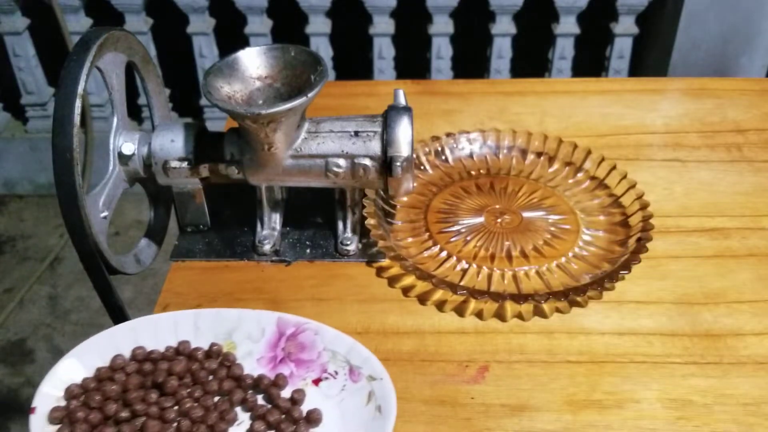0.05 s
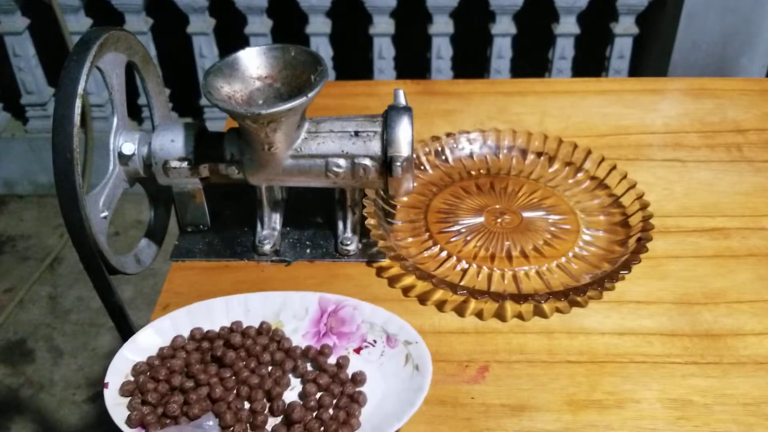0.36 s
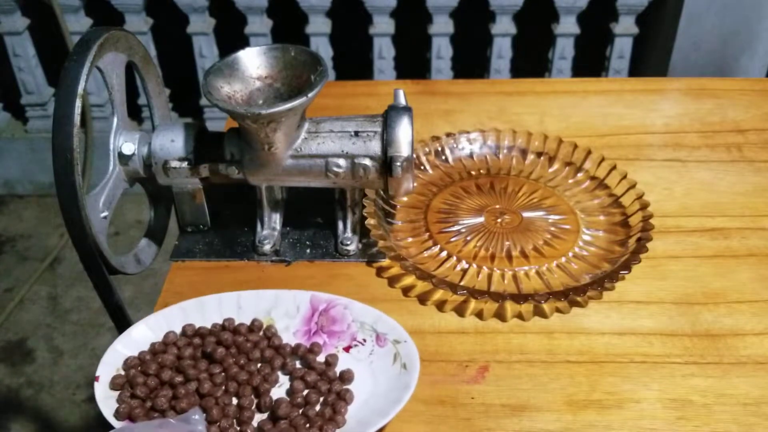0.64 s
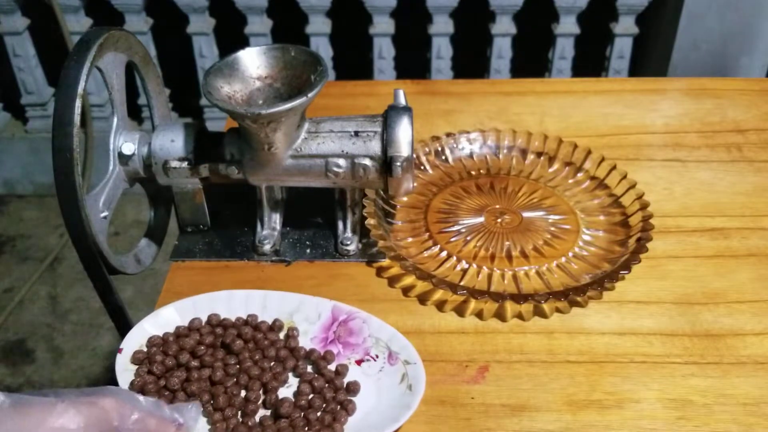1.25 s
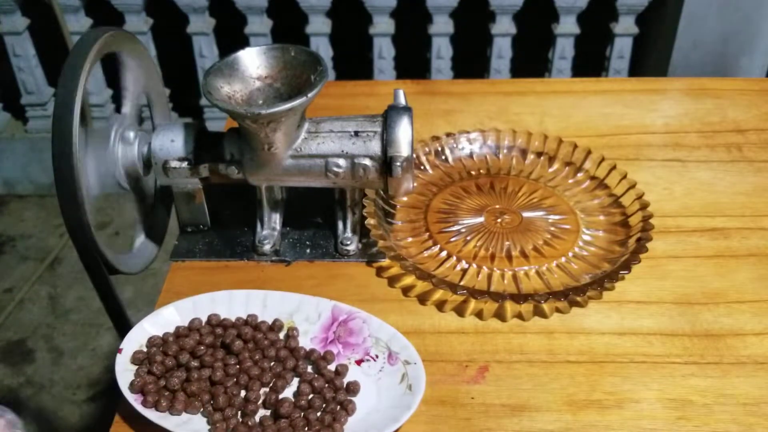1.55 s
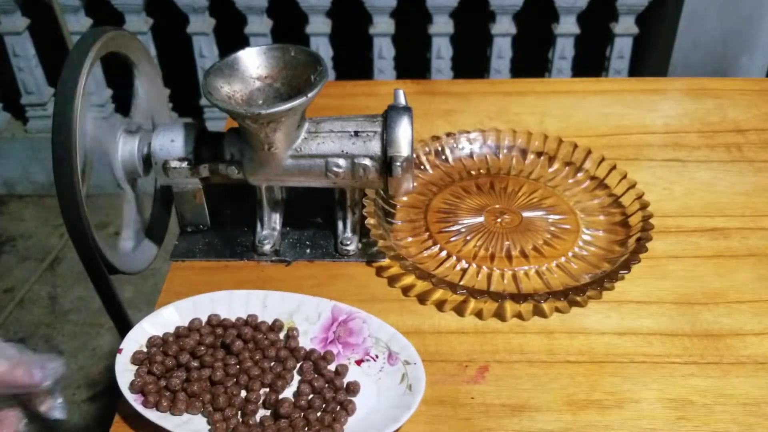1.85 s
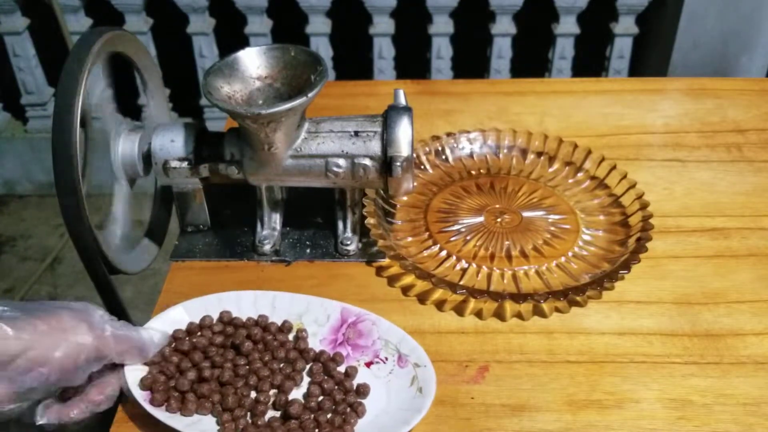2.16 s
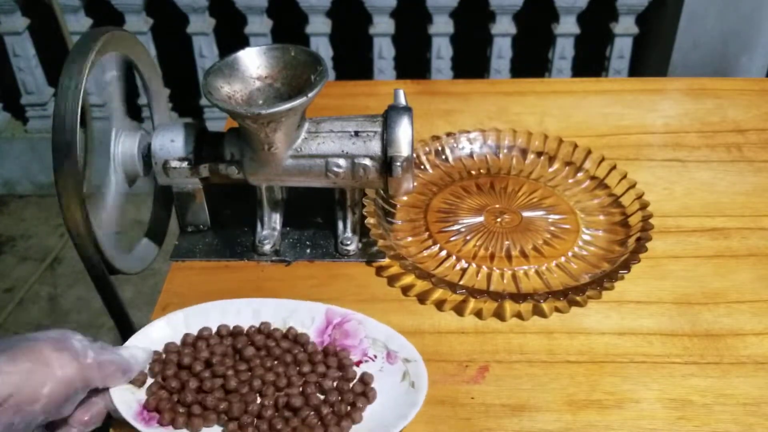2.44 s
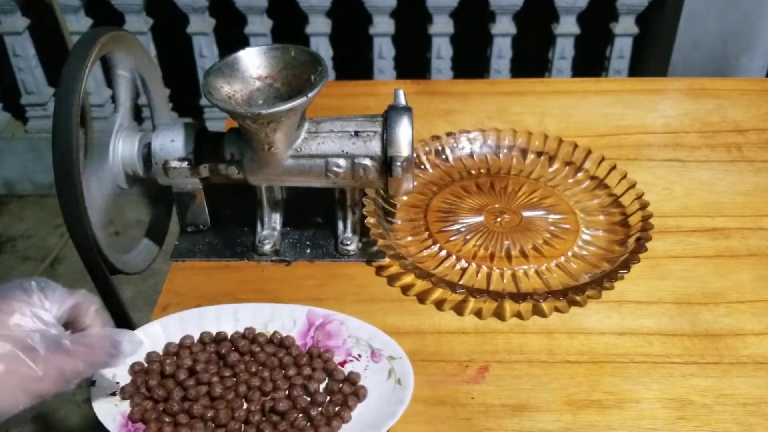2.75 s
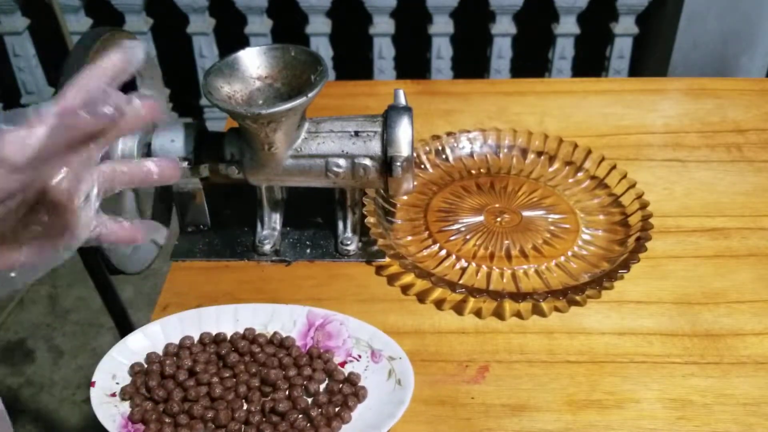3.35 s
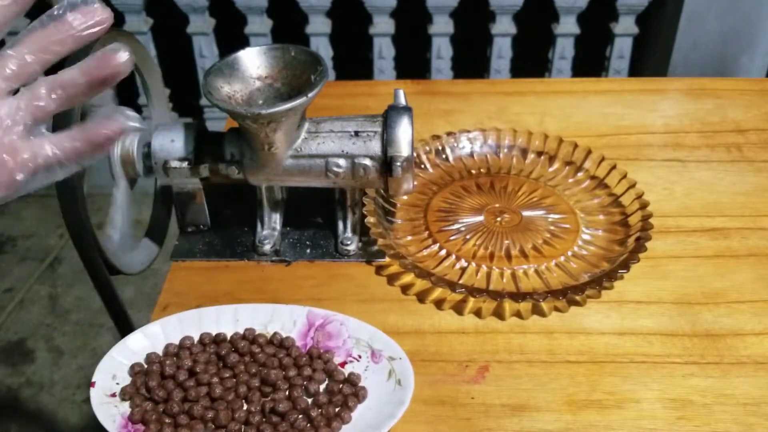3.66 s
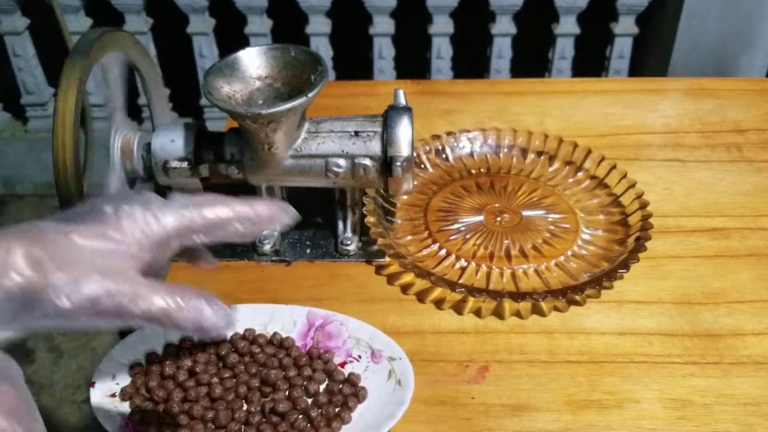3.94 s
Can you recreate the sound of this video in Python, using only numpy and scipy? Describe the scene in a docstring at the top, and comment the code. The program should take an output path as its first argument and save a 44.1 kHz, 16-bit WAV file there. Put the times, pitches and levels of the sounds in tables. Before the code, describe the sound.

An electric meat grinder runs with a low rumbling hum and uneven clanking, shaking a wooden table. Before it starts, a dish knocks and a switch clicks; near the end, a plastic glove crinkles close by on the left.

```python
"""A belt-driven meat grinder

A dish knocks on a wooden table, a switch clicks and the motor starts. It hums and forces the table
into vibration, while the loose pulley and auger clank irregularly, now and then exciting the modes
of the steel. A plastic glove crinkles, faintly at first and then close by, over a faint hiss with a
narrow band near 2 kHz."""
import sys
import numpy as np
from scipy import signal
from scipy.fft import rfft, irfft, next_fast_len
from scipy.io import wavfile
from scipy.ndimage import map_coordinates

SR = 44100
rng = np.random.default_rng(int(sys.argv[2]) if len(sys.argv) > 2 else 0)


def master_out(mix):
    """Clip the mix to full scale and print it as 16-bit PCM to the path in sys.argv[1]."""
    frames = np.transpose(np.atleast_2d(mix))
    ceiling = np.clip(frames, -1, 1)
    pcm = np.round(ceiling * 32767).astype(np.int16)
    wavfile.write(sys.argv[1], SR, pcm)


N = 176400

# Spectra of the noises. Each row: frequency in Hz, relative level in dB.
HISS_SPECTRUM = [(25, -27), (91, -13.5), (122, -1), (152, -8), (260, -17), (552, -16.5), (1050, -21),
                 (1410, -11.5), (1570, -15.5), (2120, -15), (2490, -15.5), (3170, -10), (3600, -17.5),
                 (5730, -23), (7500, -22.5), (9050, -27), (15500, -29.5)]
FILM_SPECTRUM = [(800, -36), (2500, -1.5), (4500, 2), (7800, 4), (9500, -1), (12500, 4), (15500, -0.5)]
TICK_SPECTRUM = [(100, -43), (500, -13), (3000, -2), (7000, 5.5), (15000, -2.5)]
DISH_CLICK_SPECTRUM = [(100, -50), (300, -4), (500, 2.5), (1200, -3), (1700, -10), (2300, -5), (2700, -15),
                       (3200, -25), (8000, -32)]
BUMP_CLICK_SPECTRUM = [(100, -40), (300, -13), (700, -6), (1400, 5), (1900, -11), (4000, -45)]
RUMBLE_SPECTRUM = [(25, -50), (45, -48), (57, -16), (66, -27), (80, -9.5), (98, 1.5), (118, -9.5),
                   (140, -4.5), (170, -12), (210, -9.5), (300, -6.5), (600, -56.5)]
GRIND_SPECTRUM = [(60, -34), (300, -1), (600, 7.5), (1000, -2), (1500, -11.5), (2200, -17.5), (3000, -13),
                  (5000, -24.5), (9000, -55), (15000, -64)]
CLATTER_SPECTRUM = [(80, -55), (300, -15), (600, 3.5), (780, 1.5), (950, -1.5), (1400, -3), (1750, -9.5),
                    (2200, -10.5), (3000, -29.5), (5000, -28), (12000, -59)]
SCRAPE_SPECTRUM = [(1200, -6), (2500, 2.5), (4500, 4), (5300, -14.5), (6000, -18), (8000, -7), (10000, -37),
                   (15000, -43)]
SNAP_SPECTRUM = [(150, -36), (900, 3), (1900, 3.5), (3000, -1.5), (4700, -0.5), (6500, -17), (9000, -11),
                 (15000, -26)]

# Envelopes of the glove and the running machine. Each row: time in seconds, relative level in dB.
GLOVE_FAR = [(0.0, -67.5), (0.076, -49.5), (0.18, -67), (0.366, -48.5), (0.548, -54.5), (0.716, -50.5),
             (0.898, -55.5), (1.1, -50), (1.282, -54), (1.368, -50), (1.42, -58), (1.454, -44),
             (1.498, -48), (1.55, -69)]
GLOVE_NEAR = [(1.6, -58), (1.9, -54), (2.1, -49.5), (2.3, -54), (2.7, -54.5), (2.76, -44), (2.94, -63.5),
              (3.03, -42), (3.125, -60), (3.155, -33.5), (3.23, -38.5), (3.32, -31), (3.41, -40.5),
              (3.57, -39.5), (3.68, -33.5), (3.75, -43.5), (3.83, -34.5), (3.91, -45), (4, -46)]
MOTOR_LEVEL = [(1.36, -66), (1.39, -9), (1.45, -5), (1.52, -2), (1.72, -1), (2.0, 0.5), (2.45, 0.5),
               (2.95, -2), (3.3, 2.5), (3.7, 0), (4, 1.5)]

# Ticks of switch and glove; snaps in the barrel. Each row: start in seconds, level in dB.
TICKS = [(0.357, -39), (0.593, -39.5), (0.848, -39), (1.069, -34.5), (1.359, -31.5), (2.507, -36),
         (2.671, -35), (2.735, -30), (3.033, -42), (3.053, -32.5), (3.09, -43)]
SNAPS = [(1.385, -31), (2.426, -25.5), (3.462, -27), (3.621, -21), (3.777, -21), (3.932, -20)]
# Blows on the table top. Each row: start in seconds, ring level in dB, click level in dB.
DISH_KNOCKS = [(.459, -56, -30), (.4925, -7.5, -17), (.553, -38, -38), (1.363, -19, -35.5)]
BUMPS = [(.979, -24.5, -32), (.994, -28.5, -36), (1.012, -30.5, -51), (1.039, -28, -48),
         (1.122, -23.5, -34), (1.131, -26.5, -36)]
# Impacts of pulley and auger. Each row: start in seconds, relative levels of clatter, thud and
# scrape in dB, favoured thud frequency in Hz.
CLANKS = [(1.383, -20, -28.5, -34.5, 410), (1.456, -21, -23, -32, 433), (1.503, -31.5, -20.5, -43, 352),
          (1.621, -15.5, -15.5, -40.5, 357), (1.655, -22, -20, -54, 347), (1.701, -36, -30, -58, 440),
          (1.771, -12.5, -16.5, -33, 430), (1.859, -24, -20, -49, 393), (1.899, -22.5, -29, -33.5, 450),
          (1.929, -11, -14, -31, 424), (1.969, -21.5, -25, -39, 440), (2.039, -21, -20, -43, 333),
          (2.099, -24.5, -15, -43, 456), (2.157, -27, -19.5, -53, 390), (2.246, -18, -12, -45, 374),
          (2.38, -15.5, -12, -43, 340), (2.399, -18, -16.5, -38, 410), (2.426, -10, -15.5, -32, 476),
          (2.442, -35, -20.5, -43, 433), (2.531, -15.5, -15, -39, 400), (2.572, -24.5, -22.5, -49, 476),
          (2.66, -22, -21, -37, 426), (2.69, -16, -14, -48, 391), (2.784, -21.5, -40, -35.5, 397),
          (2.867, -20.5, -13.5, -50, 420), (2.912, -21.5, -23, -53, 405), (2.989, -28, -20.5, -43, 424),
          (3.028, -18.5, -13.5, -33, 420), (3.067, -27, -24, -57, 370), (3.169, -21, -17, -37, 390),
          (3.462, -19, -17.5, -48, 490), (3.564, -23, -18, -49, 424), (3.622, -18, -13.5, -31.5, 490),
          (3.665, -19.5, -14, -50, 447), (3.779, -19.5, -17, -44, 430), (3.804, -12.5, -14.5, -32.5, 467),
          (3.849, -21, -19, -38, 405), (3.932, -20, -21.5, -33, 390)]
# Hard steel contacts. Each row: start in seconds, level in dB, favoured frequency in Hz.
CHINKS = [(1.451, -31, 4730), (1.461, -40, 7000), (1.772, -28, 1400), (1.899, -34, 5130),
          (1.931, -34, 5370), (2.427, -27.5, 2450), (2.431, -29, 6400), (2.436, -18, 781),
          (2.657, -34, 4400), (2.657, -27, 1350), (2.69, -41, 4100), (2.78, -33.5, 4600),
          (2.785, -24, 1250), (2.787, -30, 2130)]

# Modes of struck bodies. Each row: frequency in Hz, relative level in dB, 60 dB decay time in seconds.
DISH_MODES = [(349, -16, 0.077), (440, -6, 0.051), (486, 0, 0.047), (694, -14, 0.042)]
BOARD_MODES = [(221.5, -12, 0.17), (298, -10, 0.15), (382.6, -5.5, 0.18), (443, -2, 0.069),
               (501, 0.5, 0.074), (740, -6, 0.047)]
STEEL_MODES = [(776, 2.5, 0.099), (1144, 1, 0.089), (1360, 3.5, 0.073), (2092, 2, 0.077), (2428, -2, 0.071),
               (3970, -7, 0.4), (4170, -5, .18), (4570, -3.5, 0.19), (4810, -6, 0.21), (5001, -7, 0.29),
               (5570, -7, 0.24), (5800, -6.5, .22), (6514, -6, 0.22), (6850, -4, 0.27), (7950, 0, .22)]
# Resonances driven by the machine. Each row: frequency in Hz, bandwidth in Hz, relative level in dB.
MOUNT_RESONANCES = [(102.4, 23, -33.5), (228.9, 9.7, -34.5)]
TABLE_RESONANCES = [(242.3, 2.1, 8), (344, 8.3, -22), (356, 7.2, 6.5), (382.9, 12.6, 7.5),
                    (432.5, 2.7, 2.5), (479.7, 3.5, 3.5), (512, 4.4, 6.5), (535, 10, -34), (630, 10, -31),
                    (753, 6.7, -47)]

# Reverberation of the room. Each row: frequency in Hz, 60 dB decay time in seconds.
ROOM_DECAY = [(150, 0.58), (500, 0.31), (2000, 0.27), (10000, 0.076)]
# Likeness of left and right. Each row: frequency in Hz, correlation from 0 to 1.
COHERENCE = [(60, 1), (130, .98), (290, 0.97), (640, 0.63), (1400, 0.24), (3000, 0.046), (15000, 0)]
# Balance of the whole scene. Each row: frequency in Hz, left over right in dB.
SCENE_BALANCE = [(100, -0.5), (200, 2), (400, 2.5), (1300, 2.1), (2400, 2.5), (4400, 2.5), (15000, -1.5)]
# Added balance of the glove. Each row: time in seconds, left over right in dB.
GLOVE_BALANCE = [(2.9, 14), (3.3, 9.5), (4, 6.5)]
# Share of a balance taken by each channel. Each row: one factor, left then right.
SIDES = np.array([[.5], [-.5]])


def amp(db):
    """Amplitude grows tenfold for every 20 dB."""
    return 10 ** (np.asarray(db) / 20)


def unit(x):
    """Normalisation to an rms of 1."""
    return x / np.sqrt(np.mean(x ** 2) + 1e-20)


def along(points, hz):
    """Interpolation on a logarithmic frequency axis."""
    f, values = np.transpose(points)
    return np.interp(np.log(hz + 1), np.log(f + 1), values)


def curve(rows):
    """Linear interpolation in time, one value per sample."""
    return np.interp(np.arange(N) / SR, *np.transpose(rows))


def wobble(rate):
    """Random modulation: a spline through `rate` knots a second."""
    return map_coordinates(rng.standard_normal(4000), [np.arange(N) * rate / SR], mode="wrap")


def filtered(x, response):
    """Linear filtering multiplies the spectrum by a frequency response."""
    size = next_fast_len(N + SR // 2)
    return irfft(rfft(x, size) * response(np.fft.rfftfreq(size, 1 / SR)), size)[..., :N]


def resonate(x, modes):
    """Forced vibration: the responses of second-order resonators add."""
    return filtered(x, lambda f: sum(amp(db) * 1j * f * width / (hz * hz - f * f + 1j * f * width)
                                     for hz, width, db in modes))


def relax(x, seconds):
    """Exponential relaxation: a first-order lag with the given time constant."""
    pole = np.exp(-1 / (seconds * SR))
    return signal.lfilter([1 - pole], [1, -pole], x)


def high_passed(x):
    """A fourth-order high-pass filter removes the deep bass below about 185 Hz."""
    return signal.sosfilt(signal.butter(4, 185, "high", fs=SR, output="sos"), x)


def spread(pair):
    """Partial coherence: two signals mix to a left and right alike in the bass, unrelated in the treble."""
    def weights(hz):
        angle = np.arccos(np.clip(along(COHERENCE, hz), -1, 1)) / 2
        return np.array([np.cos(angle), np.sin(angle)])
    mid, side = filtered(pair, weights)
    return np.array([mid + side, mid - side])


def noise(spectrum):
    """Spectral shaping colours white noise; the result is stereo, of rms 1."""
    white = rng.standard_normal((2, N))
    return unit(spread(filtered(white, lambda hz: amp(along(spectrum, hz)))))


def fades(times, levels_db, t60, rise_samples=36):
    """Incoherent blows add in power, each decaying exponentially; returns their amplitude envelope."""
    power, t = np.zeros(N + SR), np.arange(SR) / SR
    for start, db in zip(times, levels_db):
        power[round(start * SR):][:SR] += amp(db - 60 * t / t60) ** 2
    return signal.lfilter(np.ones(rise_samples) / rise_samples, [1], np.sqrt(power[:N]))


def rings(times, levels_db, modes, vary_db, detune, rise_s):
    """Free vibration: each blow starts damped sinusoids, slightly scattered in level and pitch."""
    out, t = np.zeros(N + SR), np.arange(SR // 3) / SR
    for start, db in zip(times, levels_db):
        for hz, mode_db, t60 in modes:
            level_draw, pitch_draw = rng.standard_normal(2)
            tone = np.sin(2 * np.pi * hz * (1 + detune * pitch_draw) * t)
            attack = 1 - np.exp(-t / rise_s)
            decay = amp(db + mode_db + vary_db * level_draw - 60 * t / t60)
            out[round(start * SR):][:len(t)] += attack * decay * tone
    return out[:N]


def favour(modes, centre_hz, db_per_octave):
    """Selective excitation: where a blow lands decides which modes ring most."""
    return [(hz, db - db_per_octave * abs(np.log2(hz / centre_hz)), t60) for hz, db, t60 in modes]


def contacts(per_second, scatter_db):
    """Random contacts form a Poisson process; returns two impulse trains of uneven force."""
    occurs = rng.random((2, N)) < per_second / SR
    force = amp(scatter_db * np.clip(rng.standard_normal((2, N)), -2, 2))
    return occurs * force * rng.choice([-1, 1], (2, N))


def background():
    """Broadband hiss, with a narrow band of noise selected by two resonators in cascade."""
    resonance = [(2000, 222, 0)]
    band = unit(resonate(resonate(rng.standard_normal((2, N)), resonance), resonance))
    hiss = amp(-47.5 + 0.11 * wobble(12.1)) * noise(HISS_SPECTRUM)
    return hiss + amp(-47 + 0.3 * wobble(23)) * band


def glove():
    """Plastic film on the left: crinkling and sharper crackles add in power to modulate a noise."""
    crinkle = unit(amp(2.3 * wobble(700) + 0.21 * wobble(79)))
    fold_power = contacts(per_second=90, scatter_db=5)[0] ** 2
    crackle = amp(-7.5) * unit(np.sqrt(relax(fold_power, seconds=0.0012)))
    level_db = curve(list(GLOVE_FAR) + list(GLOVE_NEAR)) + curve(GLOVE_BALANCE) * SIDES
    return amp(level_db) * np.hypot(crinkle, crackle) * noise(FILM_SPECTRUM)


def ticks():
    """The switch and the glove give transients: bright noise that decays quickly."""
    return noise(TICK_SPECTRUM) * fades(*np.transpose(TICKS), t60=0.039)


def knocks(blows, modes, click_spectrum):
    """Impact excitation: a contact clicks and leaves the dish or the table top ringing in its modes."""
    starts, ring_db, click_db = np.transpose(blows)
    body = rings(starts, ring_db, modes, vary_db=.5, detune=.01, rise_s=0.0015)
    click = noise(click_spectrum) * fades(starts, click_db, t60=0.022)
    return high_passed(body + click)


def motor(hum_hz=100.15):
    """Forced vibration: mains hum, a belt that drives the mounting, loose parts that rattle and grind."""
    phase = 2 * np.pi * np.cumsum(hum_hz * (1 + 0.0022 * wobble(12))) / SR
    hum = sum(amp(db + 1.54 * wobble(7.4)) * np.sin(harmonic * phase)
              for harmonic, db in [(1, -40.5), (4, -31.5), (5, -27)])
    slaps = contacts(per_second=60, scatter_db=4)[0]
    boom = sum(amp(db) * unit(resonate(resonate(slaps, [(hz, width, 0)]), [(hz, hz / 2, 0)]))
               for hz, width, db in MOUNT_RESONANCES)
    rumble = amp(-27.5) * noise(RUMBLE_SPECTRUM) + boom
    # The same contacts rattle the table and modulate the grinding in the barrel.
    hits = contacts(per_second=170, scatter_db=1)
    rattle = amp(-28.5) * unit(spread(high_passed(resonate(hits, TABLE_RESONANCES))))
    grit = unit(np.sqrt(relax(hits[0] ** 2, seconds=0.036)))
    grind = amp(-32.5) * noise(GRIND_SPECTRUM) * unit(grit + .5)
    return amp(curve(MOTOR_LEVEL)) * (hum + rumble + rattle + grind)


def clanks(thud_t60=0.12):
    """Impacts of pulley and auger excite the table's modes, clatter in the housing and scrape."""
    starts, clatter_db, thud_db, scrape_db, thud_hz = np.transpose(CLANKS)
    damped = [(hz, db, thud_t60) for hz, _, db in TABLE_RESONANCES]
    thud = np.zeros(N)
    for start, db, hz in zip(starts, thud_db, thud_hz):
        modes = favour(damped, hz, db_per_octave=22)
        thud += rings([start], [db - 2.5], modes, vary_db=0, detune=0.027, rise_s=0.0019)
    swell = relax(fades(starts, clatter_db - 5.5, t60=0.12), seconds=0.0011)
    scrape = noise(SCRAPE_SPECTRUM) * fades(starts, scrape_db - 0.5, t60=0.22)
    roughness = unit(amp(3.2 * wobble(260)))
    clatter = noise(CLATTER_SPECTRUM) * swell
    return high_passed(thud) + roughness * (clatter + scrape)


def steel(rasp_share=0.35):
    """Hard contacts excite the steel's modes, with amplitude modulation as a rasp; others only snap."""
    out = noise(SNAP_SPECTRUM) * fades(*np.transpose(SNAPS), t60=0.036)
    rasp = np.sqrt(1 - rasp_share) + np.sqrt(rasp_share) * np.array([wobble(170), wobble(170)])
    for start, db, hz in CHINKS:
        modes = favour(STEEL_MODES, hz, db_per_octave=44)
        for side in range(2):
            ring = rings([start], [db], modes, vary_db=1.5, detune=0.0025, rise_s=0.00023)
            out[side] += rasp[side] * ring
    return out


def room(x, delay_samples=300):
    """Reverberation: convolution with a noise tail in which each frequency decays at its own rate."""
    hz, t, spectra = signal.stft(rng.standard_normal((2, SR // 2)), SR, nperseg=256)
    decay = amp(-60 * t / along(ROOM_DECAY, hz)[:, None])
    tail = signal.istft(spectra * decay, SR, nperseg=256)[1]
    delayed = np.pad(x, ((0, 0), (delay_samples, 0)))
    return spread(signal.fftconvolve(delayed, tail / np.linalg.norm(tail[0]), axes=1)[:, :N])


def scene():
    """Superposition: the sources add, only the impacts reverberate, and the sum leans to the left."""
    impacts = ticks()
    impacts += knocks(DISH_KNOCKS, DISH_MODES, DISH_CLICK_SPECTRUM)
    impacts += knocks(BUMPS, BOARD_MODES, BUMP_CLICK_SPECTRUM)
    impacts += clanks() + steel()
    mix = impacts + amp(-6.5) * room(impacts) + motor() + glove() + background()
    return filtered(mix, lambda hz: amp(along(SCENE_BALANCE, hz) * SIDES))


def record(dry):
    """Band limiting: an ideal low-pass filter passes nothing above 15.9 kHz."""
    return filtered(dry, lambda hz: hz < 15900)


dry = scene()
out = record(dry)
master_out(out)
```